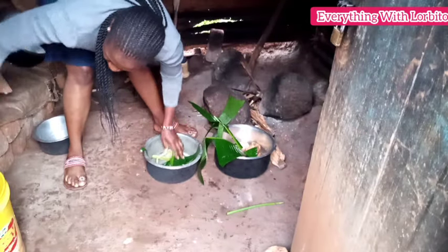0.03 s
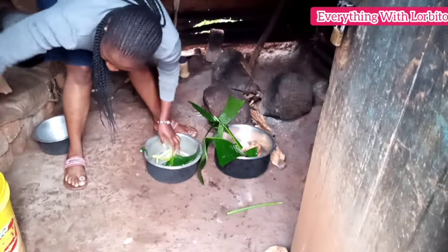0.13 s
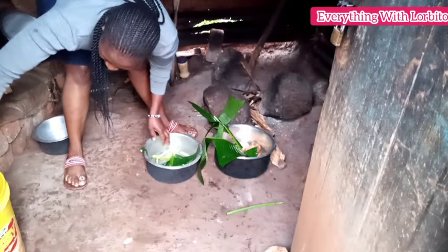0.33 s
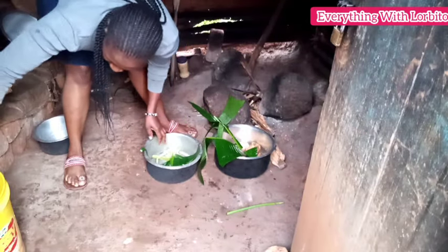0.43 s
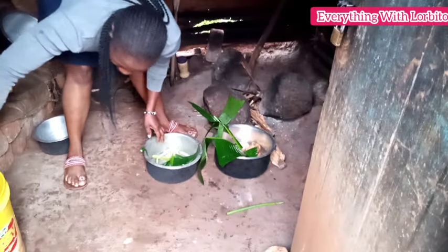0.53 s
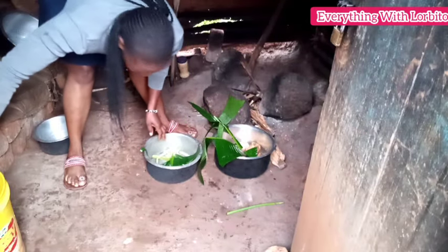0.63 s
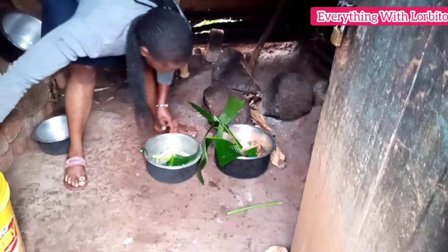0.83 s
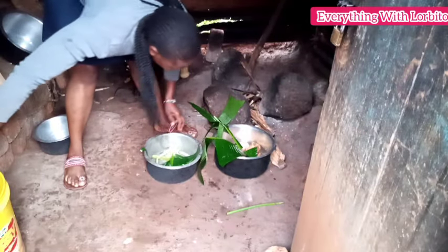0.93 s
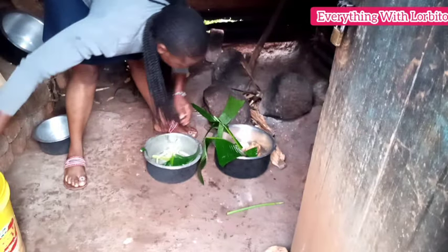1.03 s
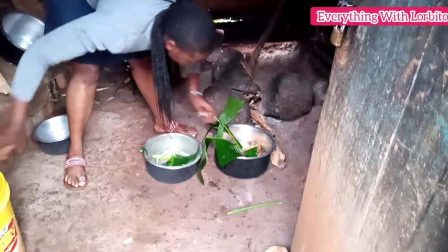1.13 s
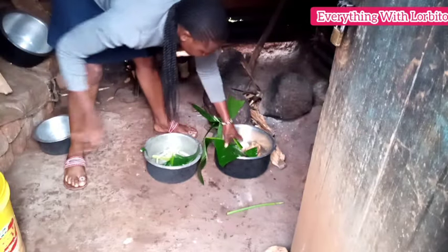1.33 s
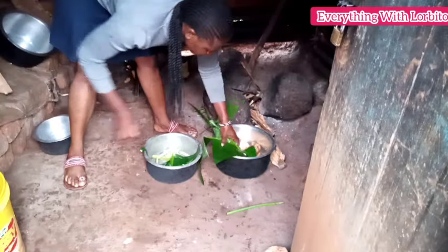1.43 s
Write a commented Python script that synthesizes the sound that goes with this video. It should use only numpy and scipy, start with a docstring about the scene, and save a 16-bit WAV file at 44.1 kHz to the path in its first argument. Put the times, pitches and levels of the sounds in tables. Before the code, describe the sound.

A thin metal pot knocks and rattles on an earth floor, then fresh leaves swish briefly

```python
"""Nudged metal pot and leaves

A thin metal pot is nudged on the earth floor of a small kitchen: it scrapes, knocks and rattles a few times,
then a handful of fresh leaves swishes past. Knocks are decaying modes plus noise bursts; squeaks, faint chirps
and hissy washes are gliding noise bands; leaves are flickering noise with tiny snaps. Faint shuffling, a low
outdoor rumble and hiss lie beneath.
"""
import sys
import numpy as np
from scipy import signal
from scipy.fft import rfft, irfft
from scipy.io import wavfile
from scipy.ndimage import uniform_filter1d

SR = 44100
rng = np.random.default_rng(int(sys.argv[2]) if len(sys.argv) > 2 else 0)


def decibels_to_gain(level_db):
    """Convert a level in decibels to a linear amplitude gain (20 dB per decade)."""
    exponent = np.asarray(level_db, float) / 20
    return 10 ** exponent


def transcribe(u):
    """Save the signal u as a 16-bit wav file named by the first command-line argument.

    u: samples, shape (n,) or (channels, n), limited to [-1, 1]; the rate is SR.
    q: integer samples, one column per channel.
    """
    v = np.clip(np.atleast_2d(u).T, -1, 1)
    q = np.round(v * 32767).astype(np.int16)
    wavfile.write(sys.argv[1], SR, q)


N = 66150


def along(table, x, log=False):
    """Table value at x, interpolated on a linear or logarithmic axis."""
    a, b = np.array(table, float).T
    return np.interp(np.log(x), np.log(a), b) if log else np.interp(x, a, b)


def tint(x, table):
    """Colours x by (f/Hz, level/dB) points and brings it to rms 1."""
    hz = np.fft.rfftfreq(len(x), 1 / SR) + 1
    y = irfft(rfft(x) * decibels_to_gain(along(table, hz, True)), len(x))
    return y / np.std(y)


def walk(rate):
    """Random levels, a new one every 1 / rate s, with slewed steps; spread near 1."""
    hold = int(SR / rate)
    levels = np.repeat(rng.standard_normal(N // hold + 1), hold)
    return uniform_filter1d(levels, hold)[:N]


def band(x, hz, width):
    """Two-pole resonance."""
    return signal.lfilter(*signal.iirpeak(hz, hz / width, SR), x)


def patchy(table, hz0, count, step, flicker_db, rate):
    """Noise of a given colour whose narrow bands flicker on their own."""
    out = np.zeros(N)
    for hz in hz0 * (1 + step) ** np.arange(count):
        narrow = band(rng.standard_normal(N), hz, hz * step) / np.sqrt(hz)
        out += decibels_to_gain(flicker_db * walk(rate)) * narrow
    return tint(np.diff(out, prepend=0) + 0.06 * out, table)


def ring(modes, t, tilt_db, share, rise_s):
    """Decaying modes of alternate sign that swell in; a random phase wobble roughens them."""
    wobble_rad, wobble_per_s, scatter_db = 0.85, 65.5, 2
    hz, db, t60 = np.array(modes).T[:, :, None]
    k = int(SR / wobble_per_s)
    wobble = rng.standard_normal((len(modes), len(t)))
    wobble = uniform_filter1d(uniform_filter1d(wobble, k), k) * np.sqrt(k * 1.5)  # spread near 1
    sign = (-1) ** np.arange(len(modes))[:, None]
    # the level wanders too, by the wobble curves in reverse mode order
    gain = sign * decibels_to_gain(db + tilt_db * np.log2(hz / 820) + scatter_db * wobble[::-1])
    tone = np.sin(2 * np.pi * hz * t + wobble_rad * wobble)
    decay = np.exp(-np.log(1000) * t / (t60 * share))
    return (gain * decay * tone).sum(0) * (1 - np.exp(-t / rise_s)) ** 2


def clack_burst(t, tilt_db, top_hz, share):
    """Broadband clack into the room: noise whose quarter-octave bands die away at their own pace."""
    # colour of the clack before tilt and top roll-off (f/Hz, level/dB)
    clack_colour = [(180, -54), (300, -14.5), (398, -18.5), (656, -20.5), (828, -3.5), (1170, -14),
                    (1460, -8), (2440, -24.5), (5610, -20), (12300, -34), (15000, -27.5), (16000, -48)]
    # tail of the room, shortened by each knock's share (f/Hz, t60/s)
    room_t60 = [(400, 0.28), (1500, 0.24), (6000, 0.25), (14000, 0.074)]
    crack_db, soft_db, crack_s = 3, 6, 0.0013  # extra attack; less of it per dB/octave of tilt; its decay
    hz = np.fft.rfftfreq(len(t), 1 / SR)
    spec = rfft(tint(rng.standard_normal(len(t)), clack_colour))
    spec = spec * decibels_to_gain(tilt_db * np.log2(hz / 820 + 0.089)) / (1 + (hz / top_hz) ** 6)
    clack = np.zeros(len(t))
    for low_hz in 300 * 2 ** np.arange(0, 5.9, .25):
        inside = (hz >= low_hz) & (hz < low_hz * 2 ** .25)
        t60 = share * along(room_t60, low_hz, True)
        clack += irfft(spec * inside, len(t)) * np.exp(-np.log(1000) * t / t60)
    crack = 1 + decibels_to_gain(crack_db - soft_db * abs(tilt_db)) * np.exp(-t / crack_s)
    return clack * np.minimum(t / 0.00072, 1) * crack


def tick_burst(t):
    """Short contact tick: fast-decaying noise through two equal resonances, peak 1."""
    decay_s, hz, width_hz = 0.0034, 1590, 910
    burst = rng.standard_normal(len(t)) * np.exp(-t / decay_s)
    tick = band(band(burst, hz, width_hz), hz, width_hz)
    return tick / np.abs(tick).max()


def pot():
    """Each knock ticks, rings wall and bottom and sends a clack into the room."""
    # knocks on the pot (t/s, wall ring/dB, bottom boom/dB, clack/dB, tick/dB, tilt/dB per octave,
    # clack top f/Hz, share of the free ring time); a negative tilt is duller
    knock_rows = [(.245, -31, -50, -30.5, -30.5, 0.76, 17700, 0.87),
                  (.257, -30.5, -33, -34, -48, 0.5, 12600, 0.79),
                  (.281, -30.5, -35.5, -37, -35, -4, 9000, 0.57),
                  (.298, -49, -35.5, -43, -53, -10, 8000, 0.57),
                  (.314, -37, -38, -58, -69, -22, 6000, 0.63),
                  (.352, -49.5, -57, -45.5, -52.5, -0.42, 11400, 0.59),
                  (0.359, -35, -43, -44, -42, -4, 6000, .45), (.48, -76, -80, -72.5, -86, 2.5, 11000, 0.7),
                  (.52, -48, -40, -50, -57.5, -3.5, 8060, 0.55),
                  (.541, -57, -51, -64, -66, 2.5, 5000, 0.44),
                  (.757, -39, -48.5, -40.5, -34, -1, 18000, 0.72),
                  (.765, -38, -60.5, -62, -53, 0, 8000, 0.43),
                  (.788, -45.5, -47, -47.5, -43.5, -3, 8000, 0.59),
                  (1.003, -56, -81, -83, -92, -16, 3020, 0.45)]
    # wall modes, before tilt, scatter and knock level (f/Hz, level/dB, free t60/s)
    wall_modes = [(640.4, -20.5, 0.21), (757, -15, .2), (822, 1.5, 0.25), (839.3, 4, 0.074),
                  (995, -17.5, 0.37), (1098, -18.5, 0.47), (1286, -16, 0.38), (1350, -22, 0.13),
                  (1470, -16, 0.12), (1683, -16.5, 0.098), (1935, -16.5, 0.2), (1990, -10.5, 0.1),
                  (2635, -25.5, 0.4), (3245, -16, 0.17)]
    # modes of the bottom and the air inside, before scatter and knock level (f/Hz, level/dB, free t60/s)
    bottom_modes = [(170.8, -18, 0.32), (255.2, -15, 0.24), (359.6, -1.5, 0.22), (413.4, -3.5, 0.22),
                    (517.7, -9.5, 0.16)]
    wall_rise_s, boom_rise_s = 0.0021, 0.0062
    out, t = np.zeros(N + SR), np.arange(SR // 3) / SR
    for s, ring_db, boom_db, clack_db, tick_db, tilt_db, top_hz, share in knock_rows:
        knock = decibels_to_gain(ring_db) * ring(wall_modes, t, tilt_db, share, wall_rise_s)
        knock += decibels_to_gain(boom_db) * ring(bottom_modes, t, 0, share, boom_rise_s)
        knock += decibels_to_gain(clack_db) * clack_burst(t, tilt_db, top_hz, share)
        knock += decibels_to_gain(tick_db) * tick_burst(t)
        out[int(s * SR):][:len(t)] += knock
    return out[:N]


def squeaks():
    """Squeaks, faint chirps, a fluttering ring and hissy washes: noise bands around slowly gliding centres."""
    # strands (start t/s, length/s, start f/Hz, end f/Hz, width/Hz)
    strand_rows = [(0, .05, 430, 430, 60), (0, .1, 1350, 1350, 50), (0, .04, 990, 990, 50),
                   (.145, .1, 436, 436, 40), (.145, .06, 812, 812, 40), (.07, .05, 900, 900, 60),
                   (.057, .05, 1550, 1600, 200), (.15, .105, 1620, 1780, 220), (.065, .2, 2420, 2350, 120),
                   (.15, .095, 2560, 2560, 80), (.13, .13, 3690, 3690, 150), (.055, .05, 4300, 4300, 2500),
                   (.155, .08, 4440, 4400, 150), (.13, .05, 5360, 5360, 250), (.04, .15, 7050, 6750, 500),
                   (.03, .07, 9000, 8900, 600), (.09, .13, 8700, 8600, 500), (.08, .03, 10400, 10400, 250),
                   (.41, .09, 3600, 4100, 500), (.43, .08, 4900, 5000, 400), (.82, .09, 2900, 2900, 200),
                   (1.06, .08, 4150, 4250, 200), (1.05, .07, 3050, 3000, 200), (1.245, .1, 4200, 3900, 900),
                   (1.12, .11, 850, 920, 100), (1.23, .1, 850, 850, 100), (1.365, .035, 550, 550, 150),
                   (1.36, .05, 1150, 1150, 200), (1.355, .045, 4000, 4000, 500),
                   (1.395, .04, 2600, 2600, 500), (1.37, .025, 9300, 9300, 2000),
                   (1.425, .035, 5700, 5700, 900), (.03, .22, 5000, 5000, 11000),
                   (.1, .14, 6200, 6100, 900), (.06, .09, 4500, 4500, 300), (.06, .07, 3200, 3100, 300),
                   (.15, .06, 700, 700, 900), (1.447, .016, 14000, 14000, 4000)]
    # rms of each strand before its fades (level/dB)
    strand_levels = [-73, -76, -73.5, -72, -71, -83, -72, -61, -74.5, -73.5, -80, -76, -83, -78.5, -75, -79,
                     -79, -85, -76, -80, -81.5, -85, -84.5, -79, -76, -74, -70.5, -76, -73, -63, -78, -58.5,
                     -77.5, -80.5, -81, -85, -76.5, -62]
    rise, fall = .15, .3  # shares of the length
    out = np.zeros(N + SR)
    for (s, length, hz, end_hz, width), db in zip(strand_rows, strand_levels):
        n = int(length * SR)
        u = np.arange(n) / n
        # smoothed complex noise sets the bandwidth, the carrier sets the pitch
        k = max(int(SR / width), 2)
        noise = rng.standard_normal((2, SR // 2))
        re, im = uniform_filter1d(uniform_filter1d(noise, k), k // 2 + 1)[:, :n]
        carrier = np.exp(2j * np.pi * np.cumsum(hz + (end_hz - hz) * u) / SR)
        strand = ((re + 1j * im) * carrier).real
        fades = np.clip(np.minimum(u / rise, (1 - u) / fall), 0, 1)
        out[int(s * SR):][:n] += decibels_to_gain(db) * strand / np.std(strand) * fades
    return out[:N]


def leaves(t):
    """Sliding hiss with tiny smeared snaps of the leaf surface; the top band swells on its own."""
    # swish of the leaves before the treble swell (t/s, level/dB)
    swish_level = [(1.365, -80), (1.378, -62.5), (1.40, -60.5), (1.421, -52.5), (1.432, -55.5),
                   (1.44, -52.5), (1.458, -56), (1.468, -57), (1.5, -59)]
    # extra level of the band over 11 kHz (t/s, level/dB)
    sheen_level = [(1.37, -17), (1.40, -10), (1.42, -3), (1.46, -1), (1.48, -8), (1.5, -6)]
    # colour of hiss and snaps before the treble swell (f/Hz, level/dB)
    leaf_colour = [(180, -56), (300, -20), (915, -3), (1250, -5), (1430, -10), (1720, -1), (4370, -4.5),
                   (5900, -4.5), (13300, -19), (15000, -6.5), (16000, -18.5)]
    snaps_per_s, snap_db = 670, -3  # snap level is relative to the hiss
    snaps = (rng.random(N) < snaps_per_s / SR) * decibels_to_gain(2.0 * rng.exponential(size=N))
    snaps = signal.lfilter([1], [1, -.97], snaps) * rng.standard_normal(N)  # each snap smears into noise
    slide = patchy([(20, 0), (20000, 0)], 396, step=.15, count=27, flicker_db=3.0, rate=33)
    x = tint(slide + decibels_to_gain(snap_db) * snaps / np.std(snaps), leaf_colour)
    low = signal.sosfiltfilt(signal.butter(4, 11000, fs=SR, output="sos"), x)
    swish = low + (x - low) * decibels_to_gain(along(sheen_level, t))
    return swish * decibels_to_gain(along(swish_level, t)) * (t > swish_level[0][0])


def shuffling(t):
    """Faint shuffling between the knocks: noise whose narrow bands flicker strongly."""
    # loudness of the shuffling (t/s, level/dB)
    shuffle_level = [(0.0, -84.5), (0.15, -75.5), (0.342, -61.5), (0.392, -66), (0.546, -77.5),
                     (0.814, -75.5), (1.052, -81.5), (1.386, -73.5), (1.5, -60.5)]
    # its colour (f/Hz, level/dB)
    shuffle_colour = [(180, -59), (300, -22.5), (428, 4.5), (603, -19.5), (824, 6), (1360, -7.5),
                      (1480, -25.5), (1610, -25), (2430, -23.5), (4170, -21), (9000, -30), (11700, -89),
                      (19800, -120)]
    noise = patchy(shuffle_colour, 290.4, step=0.066, count=66, flicker_db=8.5, rate=14.26)
    return noise * decibels_to_gain(along(shuffle_level, t))


def outdoor_rumble(t):
    """Low outdoor rumble: bass noise on a drawn level curve with a quick random waver."""
    # loudness of the rumble before the waver (t/s, level/dB)
    rumble_level = [(0.0, -70.5), (0.17, -70.5), (0.224, -80), (0.266, -67.5), (0.346, -69.5), (0.396, -61),
                    (0.668, -82.5), (0.722, -71.5), (0.784, -84), (0.914, -70), (0.94, -80.5), (1.128, -70),
                    (1.152, -77), (1.244, -74), (1.306, -64.5), (1.336, -75), (1.49, -63.5), (1.5, -59.5)]
    # its colour (f/Hz, level/dB)
    bass_colour = [(12, -55), (20, -45), (32, -21), (35, -42), (48, -5.5), (97, -11.5), (134, -4.5),
                   (208, -15.5), (320, -27), (420, -43), (700, -120)]
    waver_db = 2.5 * walk(59)
    return tint(rng.standard_normal(N), bass_colour) * decibels_to_gain(along(rumble_level, t) + waver_db)


def steady_hiss():
    """Faint coloured noise at a constant level."""
    # colour of the hiss (f/Hz, level/dB)
    hiss_colour = [(180, -13), (300, -1), (656, -6), (930, -1.5), (1780, -11), (2740, -8.5), (7950, -18),
                   (15000, -22), (16000, -12.5)]
    return tint(rng.standard_normal(N), hiss_colour) * decibels_to_gain(-76)


def scene():
    """All sources, one microphone."""
    t = np.arange(N) / SR
    foreground = pot() + squeaks() + leaves(t)
    background = shuffling(t) + outdoor_rumble(t) + steady_hiss()
    return (foreground + background)[None]


def roll_off(x):
    """The treble ends steeply here."""
    return signal.sosfilt(signal.butter(12, 16750, fs=SR, output="sos"), x)


def record(dry):
    """Low cut at 78 Hz, then a steep low pass at 15.75 kHz."""
    low_cut_hz, top_hz = 78, 15750
    mix = signal.sosfilt(signal.butter(2, low_cut_hz, "high", fs=SR, output="sos"), dry)
    mix = signal.sosfilt(signal.ellip(8, .2, 70, top_hz, fs=SR, output="sos"), mix)
    return roll_off(mix)


dry = scene()
out = record(dry)
transcribe(out)
```